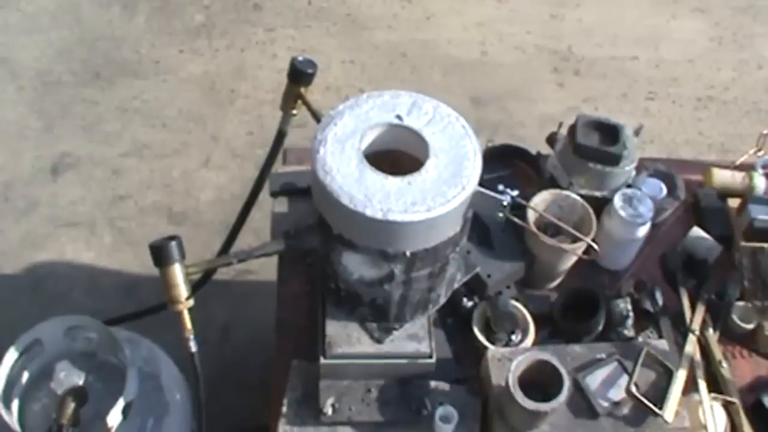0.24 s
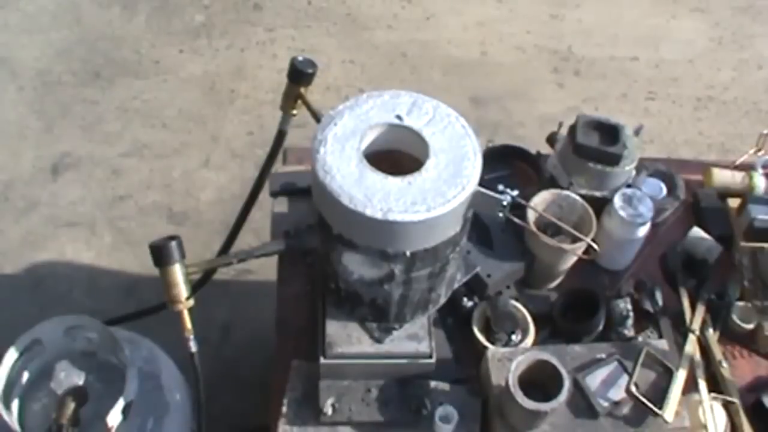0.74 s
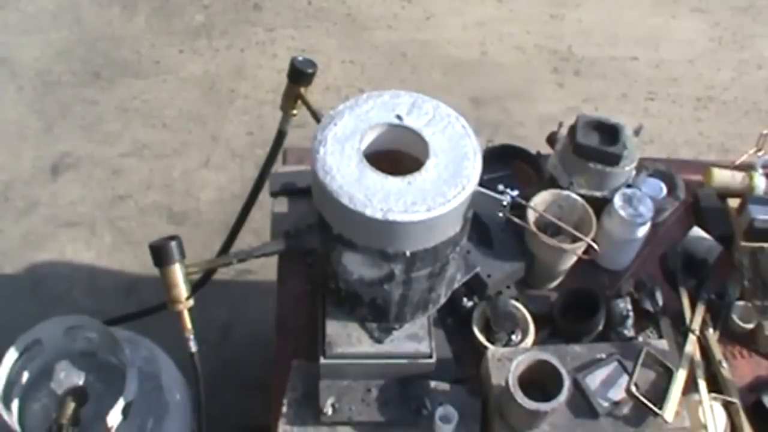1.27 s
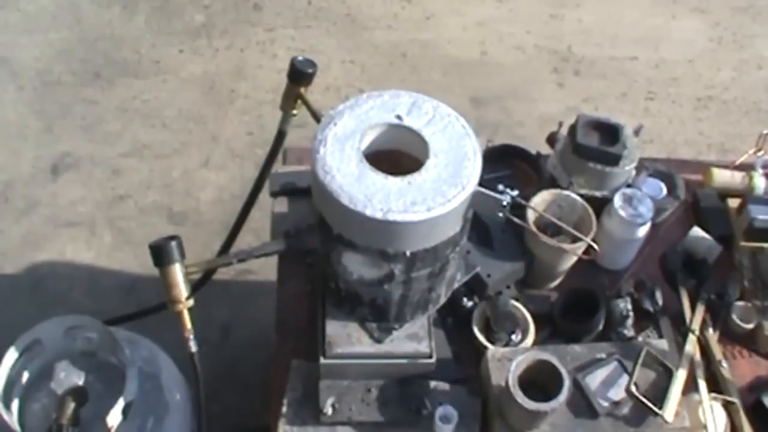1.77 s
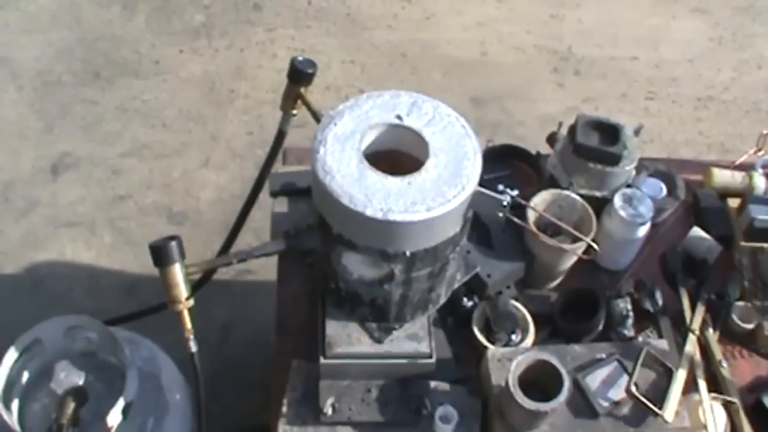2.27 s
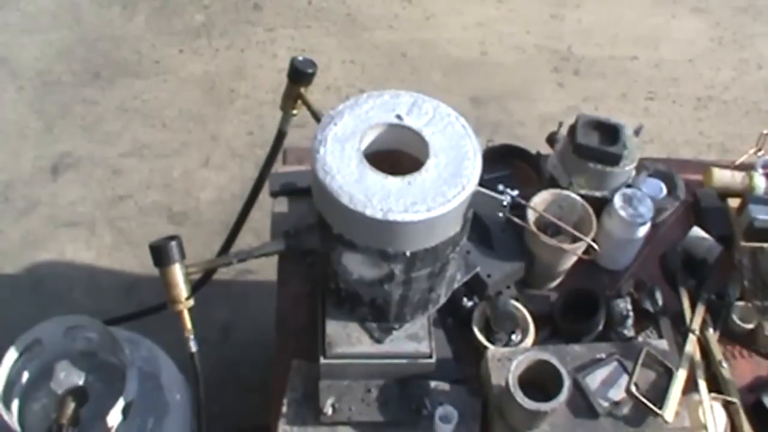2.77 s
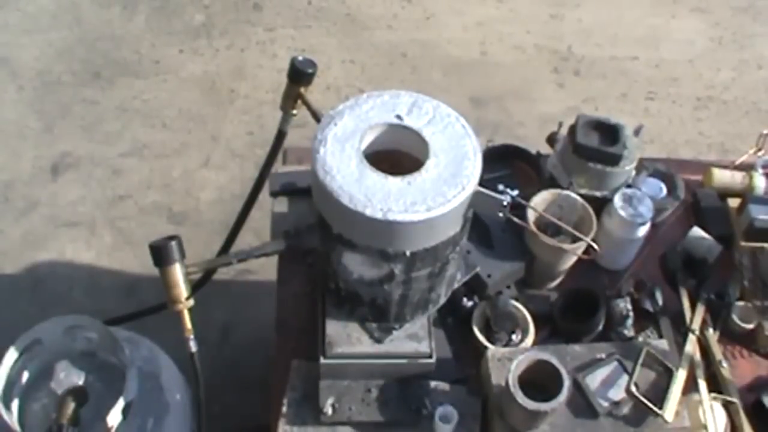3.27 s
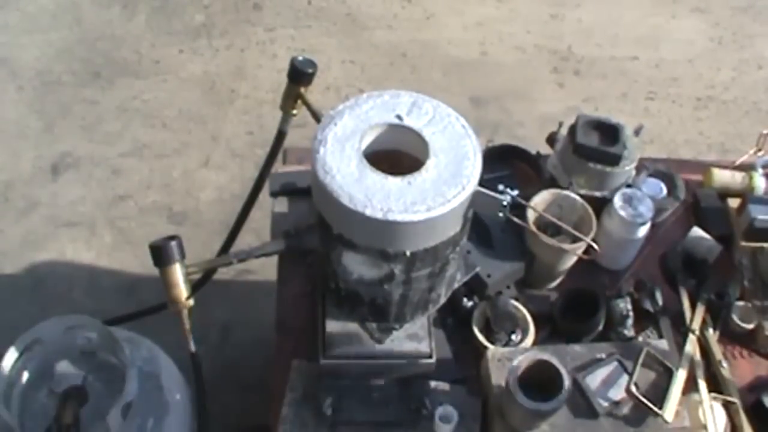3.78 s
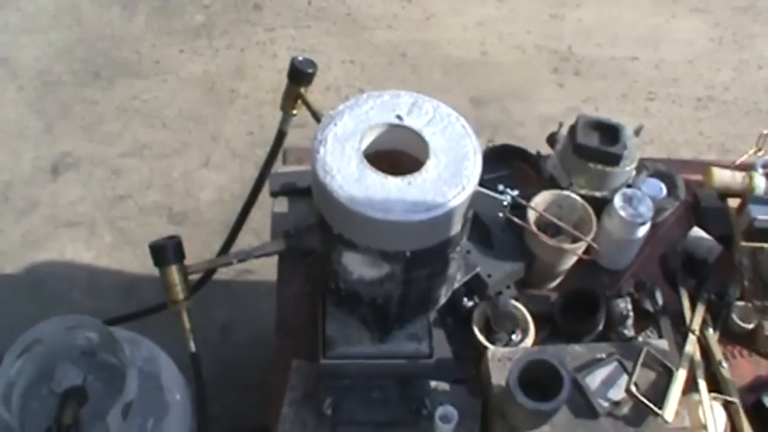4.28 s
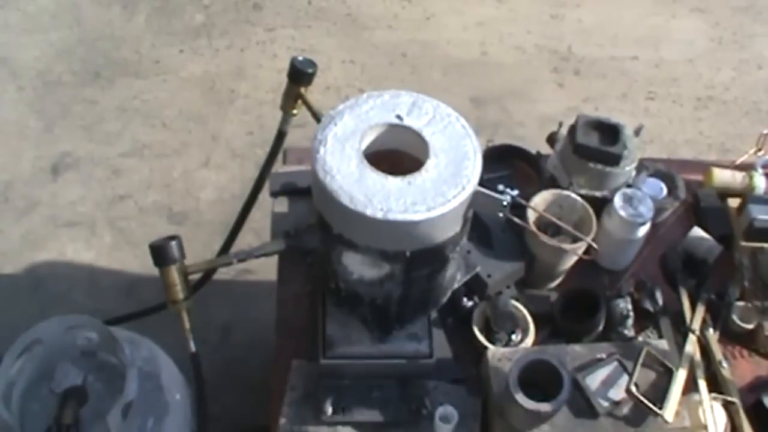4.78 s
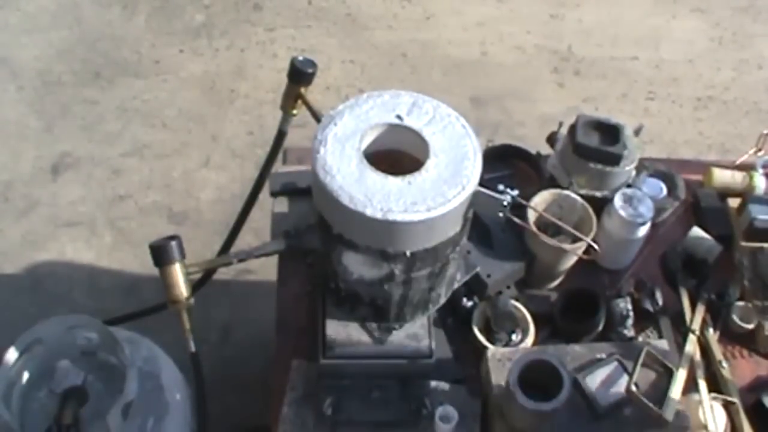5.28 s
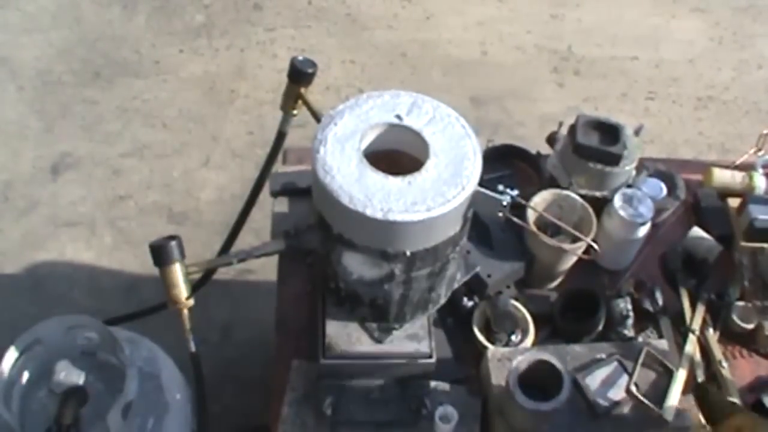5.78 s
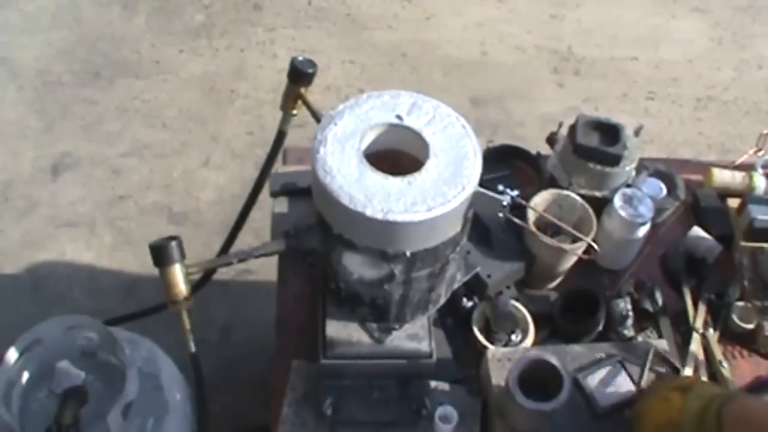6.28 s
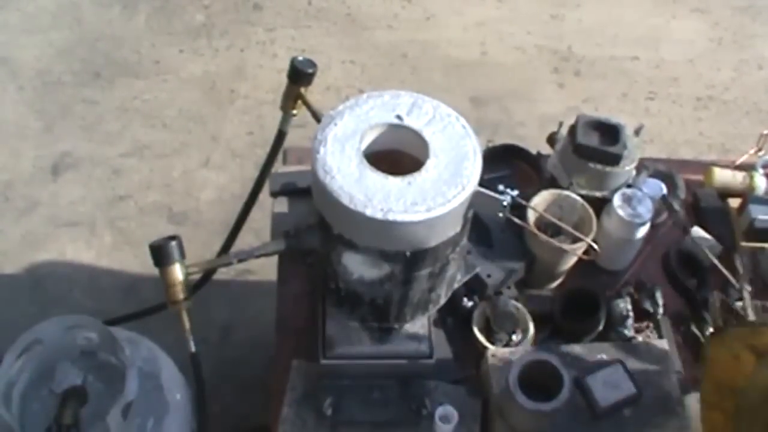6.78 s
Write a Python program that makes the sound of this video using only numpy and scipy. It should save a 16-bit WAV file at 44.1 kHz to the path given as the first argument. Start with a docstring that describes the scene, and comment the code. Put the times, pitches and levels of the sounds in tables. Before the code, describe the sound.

A continuous, hollow mid-low furnace roar with airy gas hiss on top, a brief breathy high whistle, soft gusts and tiny metallic contacts.

```python
"""Outdoors, two propane burners fire into a small melting furnace.
The flames are noise: a roar coloured by chamber resonances, a rasp at the vent and a brief hum.
Gas jets hiss, noise through tube resonances in zones; one jet whistles briefly, a breathy gliding tone.
Gusts of low noise buffet the microphone; a few ticks and a soft scrape of metal are filtered noise bursts."""
import sys
import numpy as np
from scipy import signal
from scipy.fft import rfft, irfft
from scipy.io import wavfile
from scipy.ndimage import uniform_filter1d

SR = 44100
rng = np.random.default_rng(int(sys.argv[2]) if len(sys.argv) > 2 else 0)


def transcribe(signal):
    """Save signal, clipped to [-1, 1], as a 16-bit WAV file at the path in sys.argv[1]."""
    frames = np.atleast_2d(signal).T
    limited = np.clip(frames, -1, 1)
    pcm = np.round(limited * 32767).astype(np.int16)
    wavfile.write(sys.argv[1], SR, pcm)


N = 310464
T = np.arange(N) / SR
HZ = np.maximum(np.fft.rfftfreq(N, 1 / SR), 1)

# resonances of furnace and surroundings: f/Hz, width/Hz, relative lift/dB, left-right/dB
CHAMBER_MODES = [(391.6, 40, 6, 1.5), (429.7, 37, 11.5, 3.5), (499.5, 37, 6.5, -1), (561, 34, 7.5, 4.5),
                 (623, 30, 9, -0.5), (679.8, 43, 13, -2), (741.6, 53, 6, 1.5), (829, 8.3, 7, 2),
                 (887.3, 46, 8, -11), (960, 23, 8, -3), (1072, 160, 7.5, -3), (1180, 16, 5, 3),
                 (1326, 21, 7, 5)]
# left-right likeness of the flames: f/Hz, likeness (0-1)
FLAME_LIKENESS = [(60, 0.74), (200, 1), (450, 0.91), (750, 0.95), (1100, 0.63), (1500, 0.55), (2400, 0.52),
                  (3200, 0.8), (5000, 0.96)]
# phase by which left leads in the flames: f/Hz, lead/rad
FLAME_LEAD = [(60, 0.088), (150, 0.88), (260, 0.88), (400, 0.28), (550, 0.37), (750, -0.55), (1100, 0.38),
              (1600, -0.0088), (3000, -0.37)]


def from_db(db):
    """Decibels to gain."""
    return 10 ** (np.asarray(db) / 20)


def rms_one(x):
    """Scale to unit power."""
    return x / np.sqrt(np.mean(x ** 2) + 1e-20)


def in_time(rows):
    """Each column of a time curve, interpolated at every sample."""
    s, *columns = np.transpose(rows)
    return [np.interp(T, s, column) for column in columns]


def over_hz(points):
    """A table interpolated linearly over log frequency."""
    hz, value = np.transpose(points)
    return np.interp(np.log(HZ), np.log(hz), value)


def drift(rate_hz):
    """Low-passed random signal, rms 1."""
    spectrum = rfft(rng.standard_normal(N))
    return rms_one(irfft(spectrum / (1 + (HZ / rate_hz) ** 2), N))


def panned(left_right_db):
    """Left and right gains for a level difference."""
    return from_db(np.array([[.5], [-.5]]) * left_right_db)


def lift(modes):
    """Summed dB by which resonances raise each frequency."""
    return sum(db / (1 + (2 * (HZ - hz) / width_hz) ** 2) for hz, width_hz, db, *_ in modes)


def band_noise(hz, width_hz):
    """White noise through one resonance, rms 1."""
    b, a = signal.iirpeak(hz, hz / width_hz, fs=SR)
    return rms_one(signal.lfilter(b, a, rng.standard_normal(N)))


def bell(s, half_s):
    """Gaussian swell in time, peak 1."""
    return np.exp(-((T - s) / half_s) ** 2)


def turbulence(colour_db, likeness, lead_rad=0, balance_db=0):
    """Coloured stereo noise, rms 1; likeness sets the left-right correlation, -1 opposite to 1 alike."""
    mid, side = rfft(rng.standard_normal((2, N)))
    alike = np.clip(likeness, -1, 1)
    sign = np.array([[1], [-1]])
    pair = np.sqrt(1 + alike) * mid + sign * np.sqrt(1 - alike) * side
    pair = pair * from_db(colour_db) * panned(balance_db)
    return rms_one(irfft(pair * np.exp(.5j * sign * lead_rad), N))


def wind(lumpy_db):
    """Gusts over a light breeze: lumpy low noise, mostly opposite in sign left and right."""
    # start/s, length/s, relative level/dB
    gusts = [(0.11, 0.14, -24.5), (0.42, 0.42, -24.5), (1.14, 0.07, -27), (2.76, 0.52, -25.5),
             (3.86, 0.05, -30), (4.1, 0.23, -25.5), (4.73, 0.34, -26), (5.78, 0.12, -32), (6.02, 0.63, -27)]
    # f/Hz, relative level/dB
    colour = [(10, -16), (30, -8), (55, -1), (85, 0), (120, -2), (170, -6.5), (260, -20), (600, -50)]
    attack_s, release_s, breeze_db = 0.05, 0.057, -50
    pressure = from_db(breeze_db)
    for s, length_s, db in gusts:
        rise = np.maximum(s - T, 0) / attack_s
        fall = np.maximum(T - s - length_s, 0) / release_s
        pressure = pressure + from_db(db) * np.exp(-rise - fall)
    noise = turbulence(over_hz(colour), likeness=-0.8)
    return pressure * from_db(lumpy_db * drift(rate_hz=14) - 5.5) * noise


def ticks():
    """Light contacts of metal: quickly dying noise bursts in broad resonances."""
    # t/s, onset level/dB, f/Hz, width/Hz, t60/s
    contacts = [(1.619, -28, 5200, 2600, .01), (3.609, -28.5, 4300, 2600, .014),
                (6.36, -40, 2000, 1200, .08), (6.559, -28, 2100, 700, .055), (6.562, -36, 4000, 3000, .03),
                (6.571, -33, 2400, 1500, .015)]
    out = np.zeros(N)
    for s, level_db, hz, width_hz, t60_s in contacts:
        decay_db = 60 * np.clip(T - s, 0, 1) / t60_s
        out += band_noise(hz, width_hz) * (T >= s) * from_db(level_db - decay_db)
    return out


def scrape():
    """A soft scrape of metal: band noise swells and fades."""
    # t/s, half length/s, level/dB, f/Hz, width/Hz
    settings = (2.79, 0.035, -44, 3400, 1800)
    s, half_s, level_db, hz, width_hz = settings
    return from_db(level_db) * bell(s, half_s) * band_noise(hz, width_hz)


def whistle(width_hz, upper_ratio, upper_db, upper_width_hz):
    """A breathy edge tone with a weak upper mode: carriers with random quadrature amplitudes."""
    # t/s, f/Hz, level/dB
    glide = [(1.93, 9000, -65), (2.0, 8800, -34), (2.06, 8800, -44), (2.13, 8600, -40), (2.2, 8660, -31),
             (2.26, 8450, -58)]
    pitch_hz, level_db = in_time(glide)
    phase = 2 * np.pi * np.cumsum(pitch_hz) / SR

    def breathy(angle, rate_hz):
        """Tone spread into a narrow band by random amplitudes."""
        return rms_one(drift(rate_hz) * np.cos(angle) + drift(rate_hz) * np.sin(angle))

    tone = breathy(phase, width_hz)
    upper = breathy(upper_ratio * phase, upper_width_hz)
    return from_db(level_db) * (tone + from_db(upper_db) * upper)


def hiss(gain_db, flutter_db, tube_flutter_db, patchy_db):
    """Gas jets through burner-tube resonances; zones flutter together and each a little on its own."""
    # t/s, relative level/dB
    jet_level = [(0, -33), (0.33, -31), (0.45, -34), (0.85, -31), (2.3, -32), (2.55, -33.9), (2.75, -30.5),
                 (3.05, -34), (3.55, -33), (3.75, -30), (4.28, -32.5), (5.42, -30), (5.49, -34.5),
                 (5.85, -39.5), (6.08, -36.5), (6.24, -39.5), (6.33, -36.5), (6.95, -30.5)]
    # f/Hz, relative level/dB
    colour = [(2500, -8), (3900, -12), (4400, -0.5), (5300, -3), (5900, -6), (7100, -7), (7900, 1.5),
              (9500, -1.5), (11000, 1.5), (13000, -0.5), (13900, -4.5), (15000, -9)]
    # burner-tube resonances: f/Hz, width/Hz, lift/dB
    tubes = [(4267, 69, 11.5), (4950, 115, 6), (5370, 140, 5), (6530, 400, 7), (8070, 370, 5.5),
             (9230, 730, 11.5), (13200, 260, 7), (14600, 400, 9.5)]
    # left-right difference relative to the common part: f/Hz, level/dB
    side_level = [(3000, -8), (4900, -11), (5800, -30), (6500, -23), (7200, -34), (9000, -24), (10500, -38),
                  (15000, -42)]
    # lower edge/Hz, share of the swing in dB (ratio)
    zones = [(0, .45), (4600, 0.95), (7400, 1.2), (8600, 1.35), (10000, 1.13), (12500, 1.1)]
    level_db, = in_time(jet_level)
    side_power = from_db(over_hz(side_level)) ** 2
    likeness = (1 - side_power) / (1 + side_power)
    spectrum = rfft(turbulence(over_hz(colour) + lift(tubes), likeness))
    usual_db = np.median(level_db)
    swing_db = level_db - usual_db + flutter_db * drift(rate_hz=8.8)
    common_db = tube_flutter_db * drift(rate_hz=13)
    tops_hz = [low for low, share in zones[1:]] + [SR]
    out = 0
    for (low, share), high in zip(zones, tops_hz):
        zone = irfft(spectrum * ((HZ >= low) & (HZ < high)), N)
        zone_db = share * swing_db + common_db + patchy_db * drift(rate_hz=10)
        out = out + zone * from_db(zone_db)
    return from_db(usual_db + gain_db) * out


def singing(s, half_s, level_db, hz, wander_hz):
    """The flame hums briefly near a chamber resonance: a sine of wandering pitch."""
    phase = 2 * np.pi * np.cumsum(hz + wander_hz * drift(rate_hz=10.7)) / SR
    return from_db(level_db) * bell(s, half_s) * np.sin(phase)


def rasp(sway, gain_db, sway_db, puff_db, flutter_db):
    """Small eddies of the flame tear at the vent in puffs and quick uneven spurts."""
    # t/s, relative level/dB
    rasp_level = [(0, -33.5), (0.85, -33), (1.55, -33.5), (2.05, -33.5), (2.23, -32), (2.38, -38.5),
                  (2.65, -33.5), (3.3, -33.5), (3.8, -32.5), (4.35, -36), (4.55, -33.5), (5.0, -32.0),
                  (5.85, -37), (7.04, -36)]
    # f/Hz, relative level/dB
    colour = [(500, -17.5), (900, 0), (1100, -3), (1400, -2), (1800, -6.5), (2400, -16), (3000, -16),
              (3600, -25), (4500, -29), (8000, -57), (12000, -65)]
    level_db, = in_time(rasp_level)
    colour_db = over_hz(colour) + 0.74 * lift(CHAMBER_MODES)
    noise = turbulence(colour_db, over_hz(FLAME_LIKENESS), over_hz(FLAME_LEAD), balance_db=-2.6)
    uneven_db = sway_db * sway + puff_db * drift(rate_hz=9.8) + flutter_db * drift(rate_hz=25)
    return from_db(level_db + gain_db + uneven_db) * noise


def roar(sway, level_db, sway_db):
    """Combustion noise gathered into chamber resonances whose emphasis wanders."""
    # upper raised and lower cut, each by (mean removed): t/s, level/dB
    emphasis = [(0, 0), (0.55, -1), (0.95, 0), (2.0, -1.5), (2.7, 0.5), (3.3, 0), (4.9, -0.5), (5.6, 0.2),
                (5.9, -2.4), (6.35, 0.3), (7.04, -2)]
    # t/s, left-right/dB
    balance = [(0, 0), (2.8, 0), (3.2, -0.7), (3.7, 0.5), (4.8, 0), (5.3, 0.8), (7.04, 0.7)]
    # f/Hz, relative level/dB
    colour = [(20, -44), (55, -19.5), (105, -15.5), (155, -5.5), (210, -2), (290, -7), (350, -3.5),
              (430, -0.5), (570, 1), (680, -5.5), (780, -8.5), (950, -20), (1200, -31), (2000, -72),
              (5000, -90)]
    # fine ripple among the resonances: f/Hz, width/Hz, relative level/dB
    dips = [(406, 12, -8), (440, 18, -0.5), (536.4, 7.5, -6.5), (671, 14, -2), (723, 15, -7),
            (818, 12, 1.5), (1070, 24, -3)]
    tilt_db, = in_time(emphasis)
    pan_db, = in_time(balance)
    ripple_db = lift(CHAMBER_MODES) + lift(dips)
    ripple_db = ripple_db - uniform_filter1d(ripple_db, size=1200)  # keep the broad colour
    mode_pans = [(hz, pan) for hz, width_hz, db, pan in CHAMBER_MODES]
    balance_db = over_hz([(150, 0.27)] + mode_pans)
    noise = turbulence(over_hz(colour) + ripple_db, over_hz(FLAME_LIKENESS), over_hz(FLAME_LEAD), balance_db)
    lower = irfft(rfft(noise) / (1 + (HZ / 500) ** 12), N)
    tilt = from_db(tilt_db - tilt_db.mean())
    noise = lower / tilt + (noise - lower) * tilt
    # automatic gain evens the roar's level over about a tenth of a second
    noise = noise / np.sqrt(uniform_filter1d(np.mean(noise ** 2, axis=0), size=4000))
    return from_db(level_db + sway_db * sway) * noise * panned(pan_db)


def faltering():
    """Gain of roar and rasp: each falter is a short bell-shaped dip."""
    # t/s, half length/s, depth/dB
    falters = [(1.422, 0.052, -2.2), (1.603, 0.033, -5.5), (2.044, 0.027, -3.5), (3.294, 0.035, -2)]
    return from_db(sum(db * bell(s, half_s) for s, half_s, db in falters))


def scene():
    """Sum of wind, metal, jets and flames."""
    metal = ticks() + scrape()
    jets = hiss(gain_db=-1.66, flutter_db=0.73, tube_flutter_db=0.38, patchy_db=1.25)
    jets = jets + whistle(width_hz=130, upper_ratio=1.5, upper_db=-9, upper_width_hz=350)
    sway = drift(rate_hz=5.7)  # shared by roar and rasp
    flames = roar(sway, level_db=-13.5, sway_db=0.95)
    flames = flames + rasp(sway, gain_db=3.5, sway_db=0.9, puff_db=1.0, flutter_db=0.82)
    flames = faltering() * flames
    flames = flames + singing(s=0.49, half_s=0.11, level_db=-17, hz=421, wander_hz=4.8)
    return wind(lumpy_db=6.0) + metal + jets + flames


def record(dry):
    """A quick limiter holds down the tallest swells; the top is cut steeply."""
    ceiling_db, release_db_per_s, cutoff_hz = -5.0, 150, 15000
    peak_db = 20 * np.log10(np.abs(dry).max(axis=0) + 1e-9)
    over_db = np.maximum(peak_db - ceiling_db, 0)
    release_db = release_db_per_s * T
    held_db = np.maximum.accumulate(over_db + release_db) - release_db
    limited = dry * from_db(-uniform_filter1d(held_db, size=64))
    return irfft(rfft(limited) / np.sqrt(1 + (HZ / cutoff_hz) ** 600), N)


dry = scene()
out = record(dry)
transcribe(out)
```